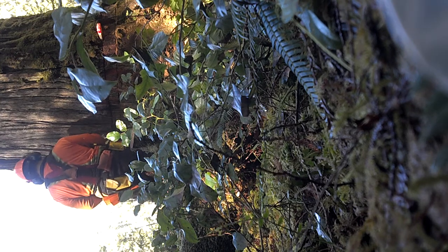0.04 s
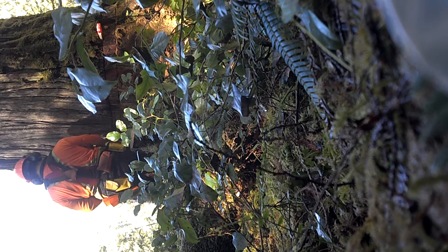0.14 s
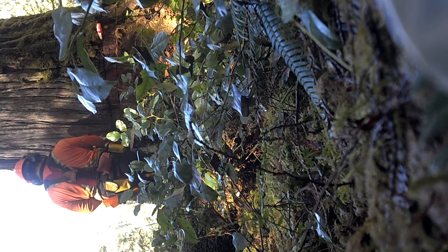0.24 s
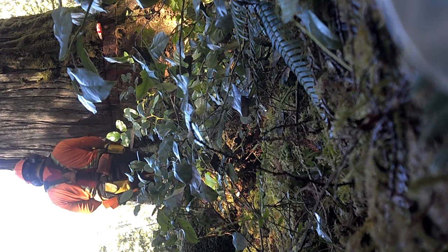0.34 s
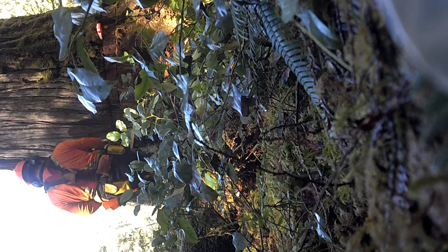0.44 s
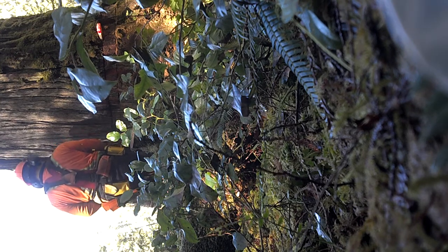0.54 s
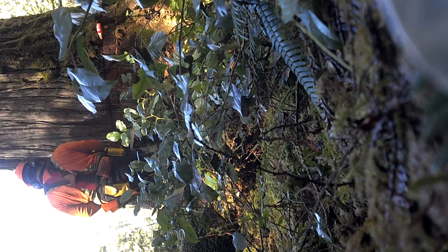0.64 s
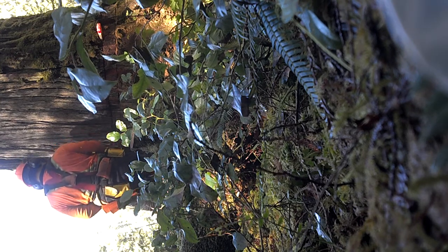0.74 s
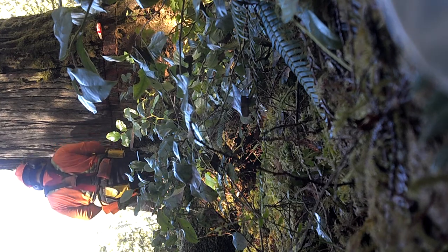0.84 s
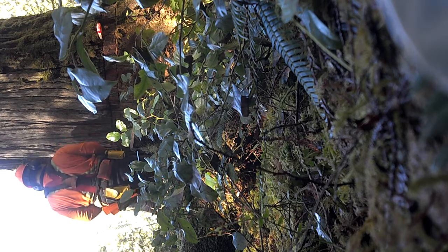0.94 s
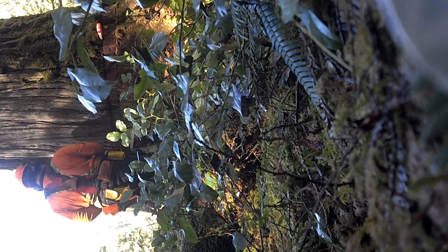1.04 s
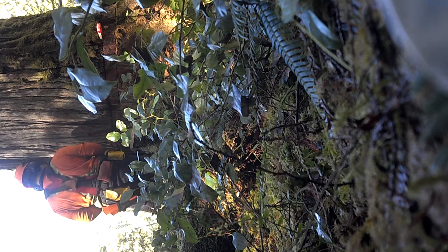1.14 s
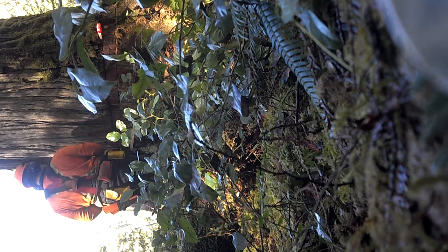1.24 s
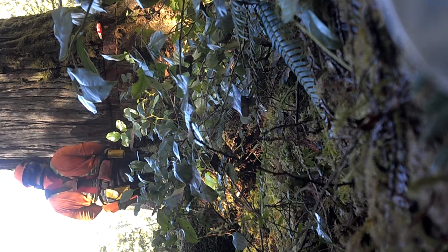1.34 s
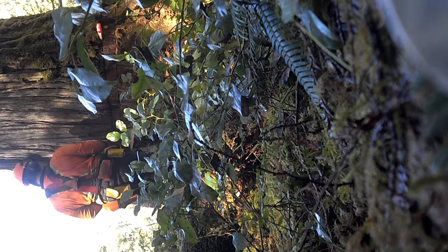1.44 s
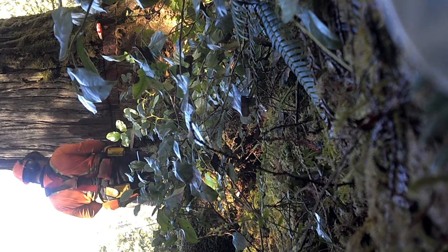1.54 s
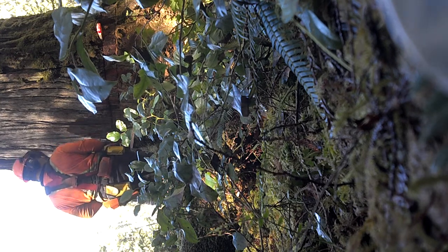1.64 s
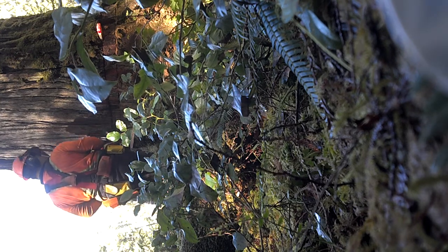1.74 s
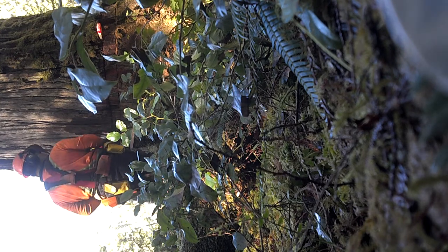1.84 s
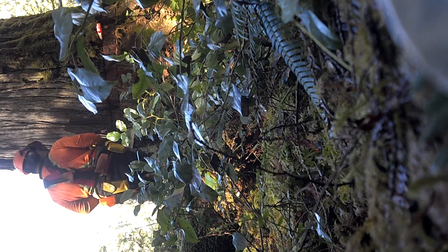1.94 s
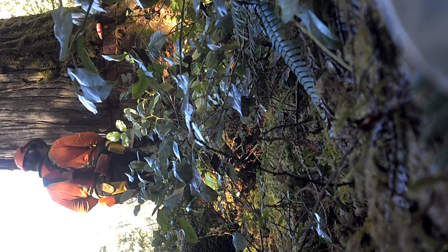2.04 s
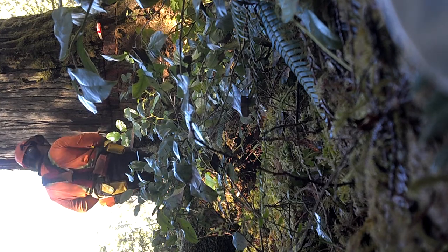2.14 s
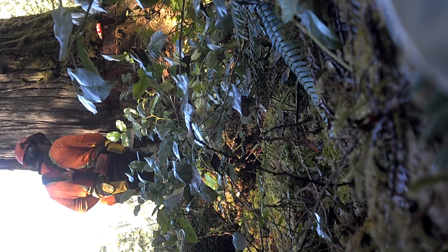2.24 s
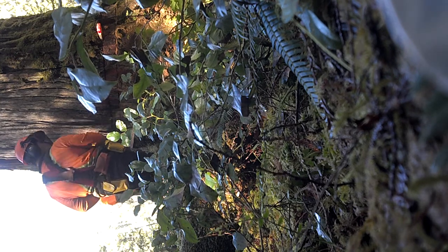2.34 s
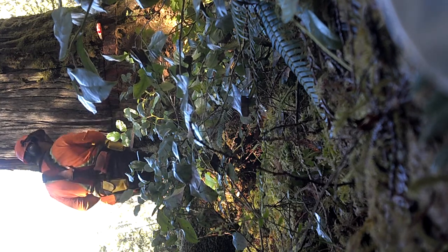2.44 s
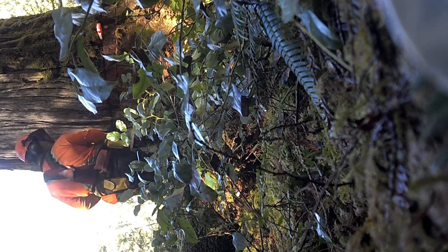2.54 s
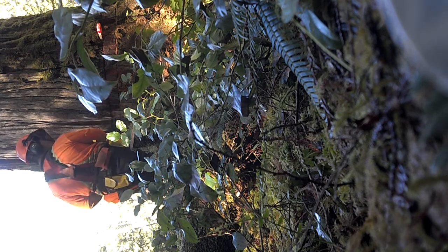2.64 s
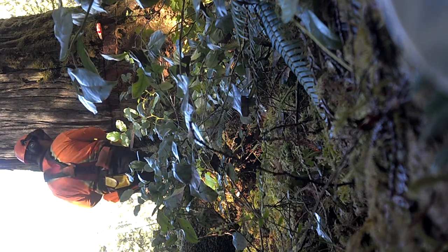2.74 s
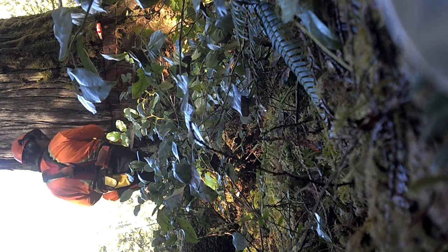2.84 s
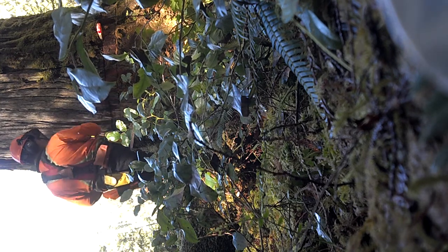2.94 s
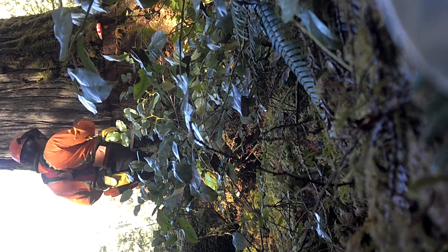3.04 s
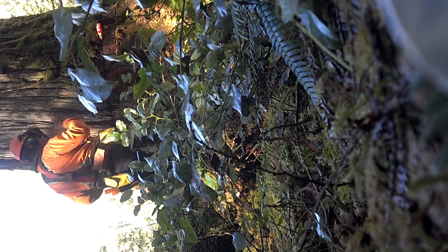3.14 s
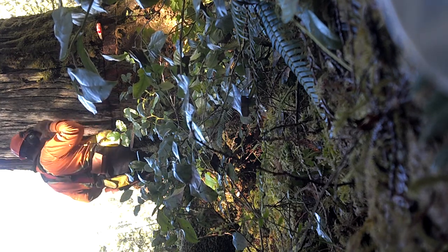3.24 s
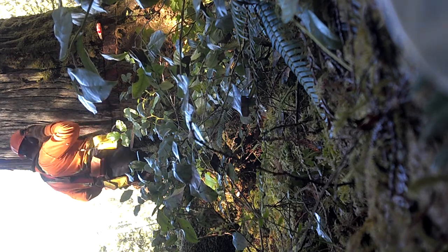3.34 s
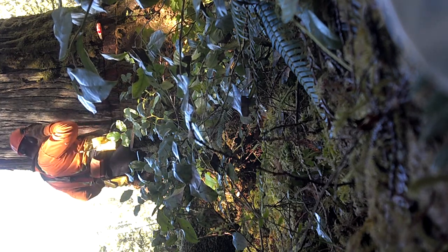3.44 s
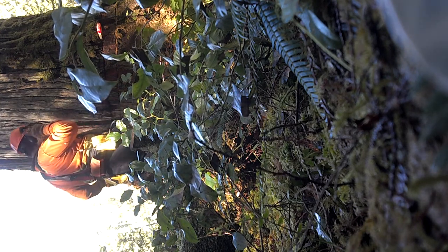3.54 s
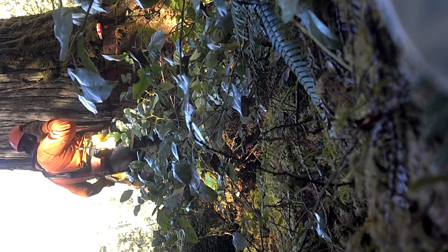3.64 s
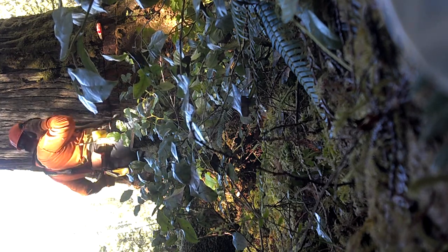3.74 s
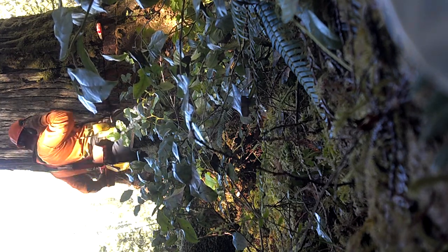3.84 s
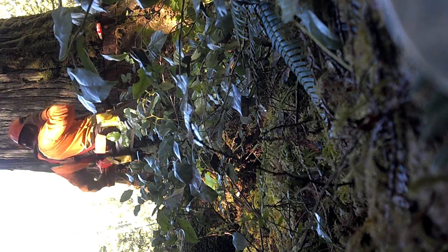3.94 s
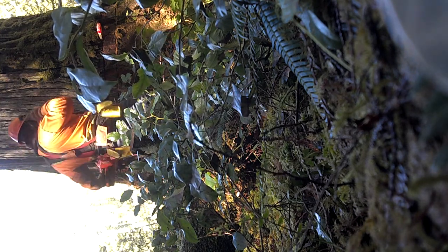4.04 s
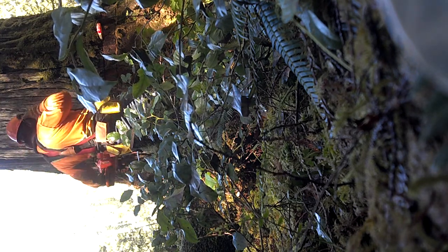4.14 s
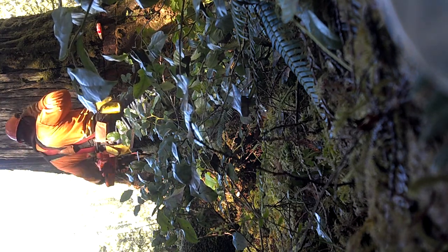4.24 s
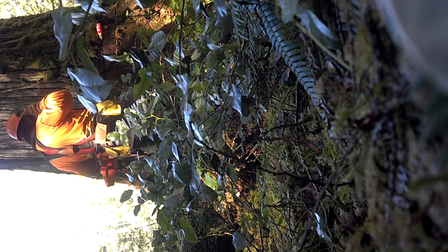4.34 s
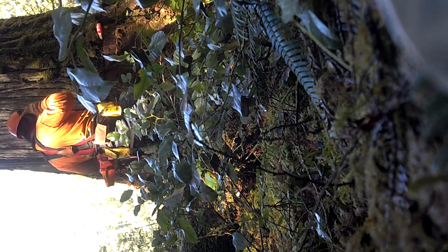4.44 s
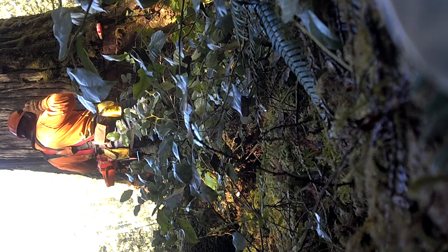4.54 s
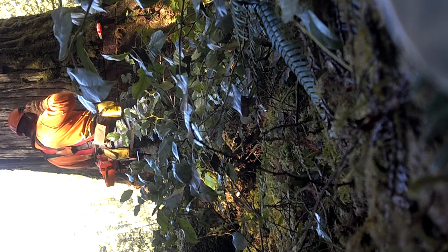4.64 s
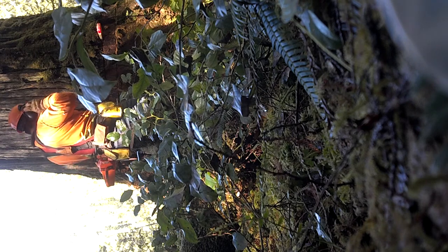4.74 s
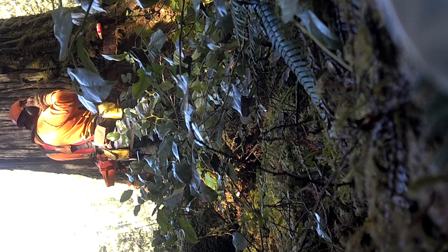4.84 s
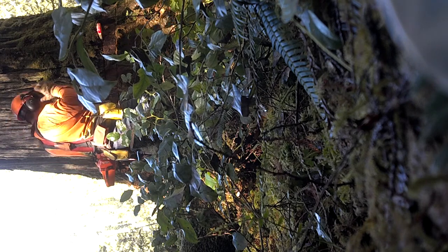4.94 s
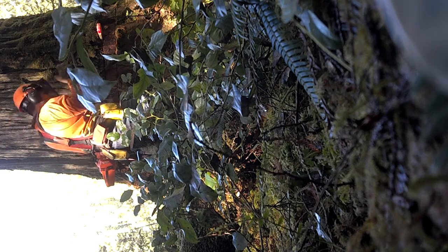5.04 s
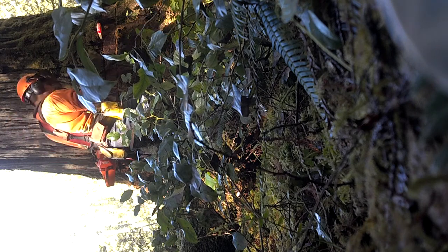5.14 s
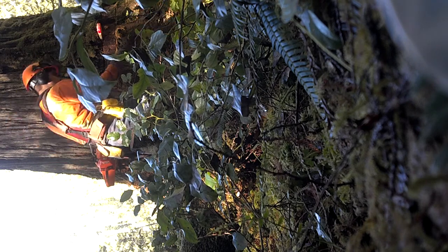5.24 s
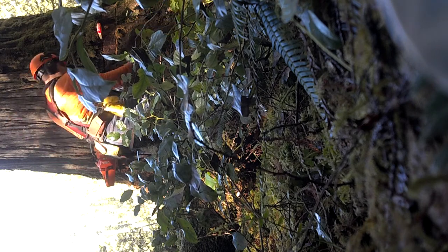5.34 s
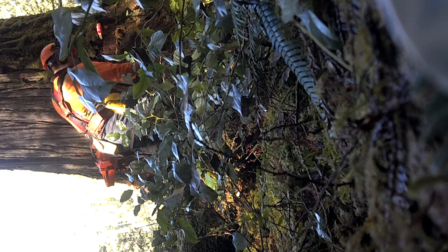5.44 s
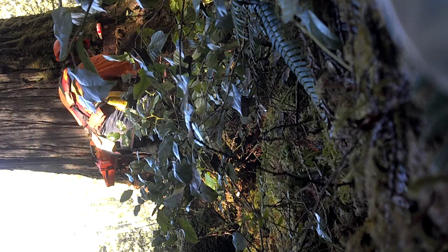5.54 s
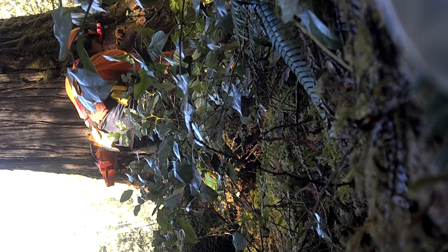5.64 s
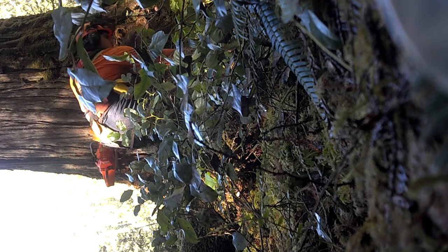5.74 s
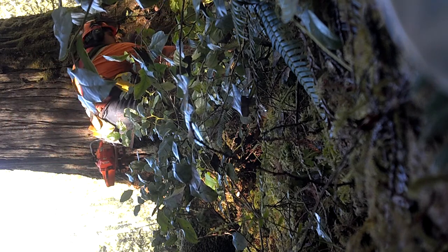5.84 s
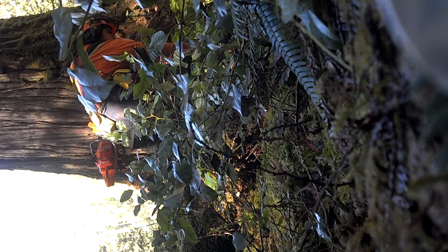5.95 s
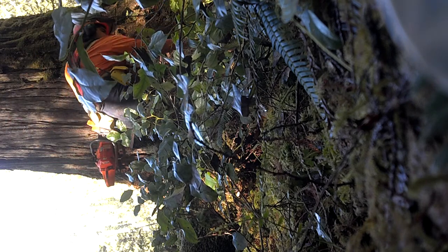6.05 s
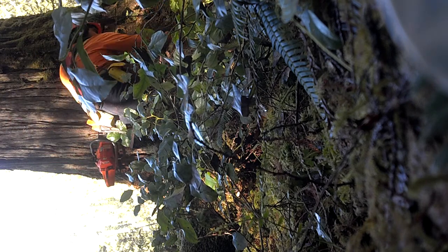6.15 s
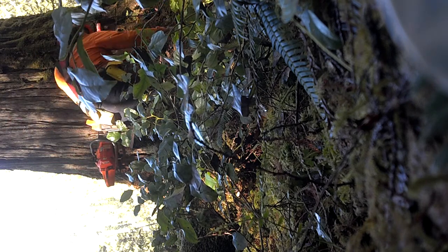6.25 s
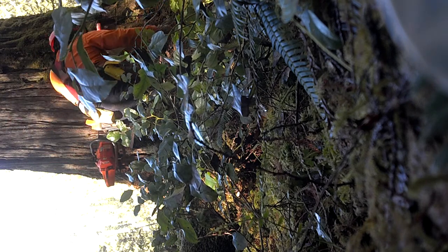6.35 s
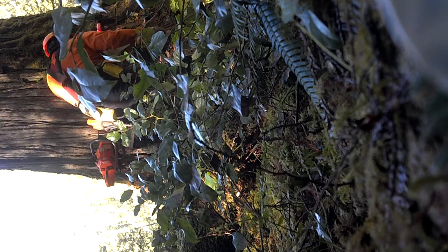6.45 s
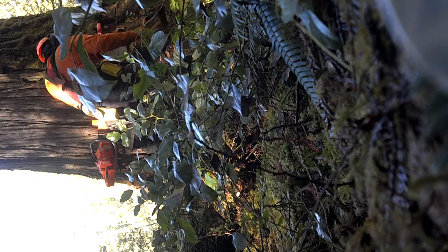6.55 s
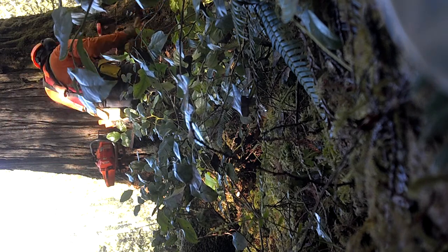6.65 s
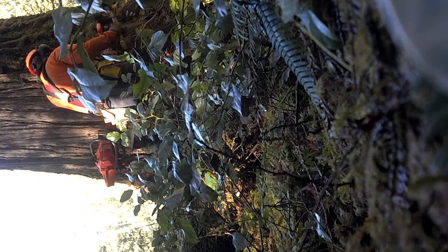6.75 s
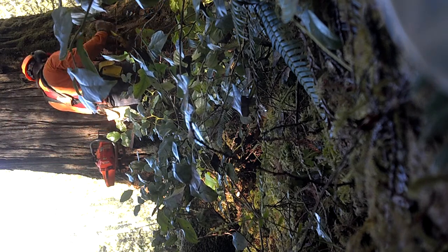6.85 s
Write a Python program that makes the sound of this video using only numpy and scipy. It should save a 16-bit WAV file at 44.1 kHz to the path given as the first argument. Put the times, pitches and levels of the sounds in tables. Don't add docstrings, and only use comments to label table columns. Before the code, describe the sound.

Four raspy throttle bursts from a two-stroke saw, an uneven idle, engine cut, then quiet forest with small clacks and one solid wedge blow.

```python
import sys
import numpy as np
from scipy import signal
from scipy.fft import rfft, irfft, next_fast_len
from scipy.io import wavfile
from scipy.ndimage import uniform_filter1d, map_coordinates

SR = 44100
rng = np.random.default_rng(int(sys.argv[2]) if len(sys.argv) > 2 else 0)


def nominal_scale(level):
    x = np.asarray(level, float) / 20
    return 10 ** x


def wav_out(sig):
    wavfile.write(sys.argv[1], SR, np.round(np.clip(np.atleast_2d(sig).T, -1, 1) * 32767).astype(np.int16))


N = 303849

IGNITION_OFF = 3.83
FREE_TURNS_END = 4.2


def along(points, hz):
    f, value = np.transpose(points)
    return np.interp(np.log(hz + 1), np.log(f + 1), value)


def filtered(x, response):
    m = next_fast_len(N + SR // 2)
    return irfft(rfft(x, m) * response(np.fft.rfftfreq(m, 1 / SR)), m)[..., :N]


def resonant(x, modes, heat=1):
    def response(f):
        gain = 0
        for k, (centre, width, db) in enumerate(modes):
            damping = 1j * f * width
            gain = gain + (-1) ** k * nominal_scale(db) * damping / ((centre * heat) ** 2 - f * f + damping)
        return gain / np.sqrt(np.mean(abs(gain) ** 2))
    return filtered(x, response)


def shifting(x, modes, share, spread):
    cool = resonant(x * np.cos(share * np.pi / 2), modes, 1 - spread)
    return cool + resonant(x * np.sin(share * np.pi / 2), modes, 1 + spread)


def noise(spectrum, channels=1):
    x = filtered(rng.standard_normal((channels, N)), lambda hz: nominal_scale(along(spectrum, hz)))
    return x / x.std()


def pulses(times, sizes):
    at = np.asarray(times)[:, None] * SR
    taps = np.floor(at) + np.arange(-7, 9)
    shape = np.sinc(taps - at) * np.cos(np.pi * (taps - at) / 18) ** 2
    index = np.clip(taps, 0, N).astype(int).ravel()
    return np.bincount(index, (shape * sizes[:, None]).ravel(), N + 1)[:N]


def dying(x, t60):
    return signal.lfilter([1], [1, -nominal_scale(-60 / (t60 * SR))], abs(x))


def wobble(rate):
    return map_coordinates(rng.standard_normal(int(N * rate / SR) + 4), [np.arange(N) * rate / SR])


def drift(rate):
    return np.clip(.5 + 0.35 * wobble(rate), 0, 1)


def soft(x):
    return uniform_filter1d(uniform_filter1d(x, size=17), size=17)


def breathy(x):
    return x + dying(x, .025) * nominal_scale(-41) * rng.standard_normal(N)


# t/s, crank speed f/Hz, exhaust level/dB
ENGINE = [(0, 58, -25), (0.297, 61.2, -28.5), (0.371, 86.1, -20), (0.438, 100, -21.5),
          (0.682, 182.4, -26.5), (0.791, 147, -26), (0.961, 188.8, -24), (1.13, 143.7, -25.5),
          (1.269, 181, -25), (1.489, 126, -27.5), (1.602, 169.6, -24.5), (1.7, 187.4, -25.5),
          (2.091, 105.2, -27), (2.199, 109.7, -23.5), (2.44, 79.4, -25), (2.622, 65.2, -26),
          (2.93, 58, -24.5), (3.83, 56.3, -26.5)]
# from t/s, to t/s, clatter level/dB
THROTTLE = [
    (0.313, 0.689, -37),
    (0.801, 0.965, -39),
    (1.138, 1.279, -33.5),
    (1.503, 1.699, -30.5),
]


def engine(t):
    s, hz, db = np.transpose(ENGINE)
    off = np.clip(t - IGNITION_OFF, 0, FREE_TURNS_END - IGNITION_OFF)
    speed = np.interp(t, s, hz) - 72 * np.maximum(off - .03, 0)
    at_rest = t < THROTTLE[0][0]
    coast_db = -60.5 + 8.5 * np.log2(speed / 58) - 3 * at_rest
    clatter_db = coast_db
    for opens, shuts, open_db in THROTTLE:
        rise = 1 - np.exp(-np.maximum(t - opens, 0) / 0.0047)
        fall = np.exp(-np.maximum(t - shuts, 0) / 0.0042)
        clatter_db = clatter_db + rise * fall * (open_db - coast_db)
    return speed, np.interp(t, s, db) - 14 * off, clatter_db


# t/s, peak level/dB, crack level/dB
KICKS = [(.299, -10, -34), (.3165, -10, -37.5), (.332, -9.5, -37), (.3445, -11, -43.5), (.794, -19, -28),
         (1.132, -21.5, -29.5), (1.492, -37.5, -25.5), (1.709, -23, -29.5), (2.354, -14.5, -61),
         (2.491, -9, -56), (2.547, -15, -40), (2.65, -13.5, -43), (2.727, -19, -51.5), (2.776, -15, -55.5),
         (2.808, -11.5, -45), (2.854, -11, -51.5)]
# t/s, peak level/dB, crack level/dB
LUMPY_IDLE = [(2.9593, -7, -53), (2.9942, -9.5, -59.5), (3.0116, -8, -40.5), (3.0639, -7.5, -42.5),
              (3.1174, -8, -41.5), (3.1703, -9, -43), (3.222, -11.5, -71), (3.2404, -8.5, -52),
              (3.292, -9.5, -40), (3.3452, -8, -49), (3.379, -16, -69), (3.3976, -7.5, -40),
              (3.449, -8.5, -64.5), (3.4851, -8, -48), (3.5204, -10.5, -69), (3.5385, -8.5, -60),
              (3.5737, -8, -49), (3.6276, -7.5, -39.5), (3.680, -8, -41), (3.733, -12.5, -83),
              (3.7498, -9.5, -40.5), (3.7981, -11.5, -71.5), (3.8154, -10, -43)]
# t/s, peak level/dB
BUMPS = [(4.202, -13), (4.237, -12), (4.275, -11), (4.324, -12), (4.382, -13), (4.447, -16.5), (4.518, -18)]
# turns waited, crack level/dB
FIRST_IDLE = [(0, -56), (3, -58), (1, -59), (2, -58), (2, -57), (2, -53), (1, -52), (2, -56)]
# turns waited, crack level/dB
SPUTTER = [(0, -31), (2, -29), (2, -30), (2, -29)]
# start t/s, turn t/s, peak level/dB, rhythm table
SPELLS = [
    (.0285, .018, -13, FIRST_IDLE),
    (2.119, .00917, -27, SPUTTER),
]


def firings():
    rows = KICKS + LUMPY_IDLE + [(s, db, db - 54.5) for s, db in BUMPS]
    for start, turn_s, peak_db, rhythm in SPELLS:
        waits, crack_db = np.transpose(rhythm)
        weak = np.r_[waits[1:], 0] == 1
        rows += zip(start + turn_s * np.cumsum(waits), peak_db + 2.5 - 1 * weak, crack_db)
    return np.array(sorted(rows))


def crank(t, speed, fired):
    turned = np.cumsum(speed) / SR
    phase = np.interp(fired, t, turned)
    whole = np.cumsum(np.maximum(np.round(np.diff(phase, prepend=phase[0])), 0))
    turns = turned + np.interp(t, fired, whole - phase)
    return np.interp(np.arange(-2, np.interp(FREE_TURNS_END - .01, t, turns)), turns, t)


def revolutions():
    t = np.arange(N) / SR
    speed, exhaust_db, clatter_db = engine(t)
    opened = sum(((t > a) & (t < b)) * 1. for a, b, _ in THROTTLE)
    fired, fired_db, crack_db = firings().T
    turn = crank(t, speed, fired)
    at = (turn * SR).astype(int)
    luck = rng.standard_normal((900, 3))[:len(turn)]
    free = abs(turn[:, None] - fired).min(1) > .003
    since_shut = np.min([np.where(turn > b, turn - b, 9) for _, b, _ in THROTTLE], axis=0)
    stumble = 1.5 * (since_shut < .05) * (-1) ** np.arange(len(turn))
    size = free * nominal_scale(exhaust_db[at] + stumble + 0.42 * luck[:, 0]) * np.sqrt(SR / speed[at])
    turn = turn + .00003 * luck[:, 1]
    powered = turn < IGNITION_OFF
    idling = (speed[at] < 62) & powered
    lumpy = ((turn > LUMPY_IDLE[0][0]) | (turn < KICKS[0][0])) & powered
    turn = turn + .0003 * idling * luck[:, 1]
    size = size * nominal_scale(idling * .7 * luck[:, 2] - 2 * lumpy)
    return dict(
        t=t, speed=speed, exhaust_db=exhaust_db, clatter_db=clatter_db, opened=opened,
        fired=fired, crack_db=crack_db, turn=turn, at=at, luck=luck, size=size,
        fast=np.clip((speed[at] - 62) / 30, 0, 1),
        full=np.clip((speed[at] - 92) / 28, 0, 1),
        shut=size * (1 - opened[at]),
        live=np.clip(1 - (turn - IGNITION_OFF) / 0.14, 0, 1),
        bang=nominal_scale(fired_db + 21),
        hard=np.interp(fired, t, speed) > 100,
        hot=np.clip((speed - 120) / 60, 0, 1))


# f/Hz, width f/Hz, level/dB
CATCHING = [(150, 85, 6.5), (328, 82, -2), (454, 66, 6.5), (800, 69, -1.5), (1080, 230, -5.5)]
# f/Hz, width f/Hz, level/dB
BLAST = [(125.8, 37, 20), (336, 68, 13), (499, 29, 13), (840, 85, 4), (1040, 160, -9.5), (1416, 74, -1),
         (1750, 1460, -12), (1860, 600, -21)]


def blast(turn, at, size, opened, full, fired, bang, hard, **_):
    catching = size * opened[at] * (1 - full)
    out = -resonant(soft(pulses(turn, catching * nominal_scale(4.0))), CATCHING)
    gulp = dying(pulses(turn, catching * nominal_scale(-33)), 0.04) * rng.standard_normal(N)
    out += resonant(gulp, BLAST)
    blasts = breathy(pulses(turn, size * opened[at] * full * nominal_scale(5.5)))
    blasts += pulses(fired, bang * hard * nominal_scale(3.0))
    return out - shifting(blasts, BLAST, drift(12.14), spread=0.052)


# f/Hz, width f/Hz, level/dB
COASTING = [(134, 38, 8.5), (352, 53, 10), (500, 29.4, 13), (809, 38, 8), (1025, 46, -2), (1300, 110, -10),
            (1900, 1060, -41.5)]


def coasting(turn, speed, shut, fast, **_):
    puffs = breathy(pulses(turn, shut * fast))
    brisk = np.clip((speed - 100) / 30, 0, 1)
    puffs = puffs * brisk + soft(puffs * (1 - brisk))
    return shifting(puffs, COASTING, np.clip(drift(8.3) + (speed - 145) / 90, 0, 1), spread=0.044)


# f/Hz, width f/Hz, level/dB
MUFFLER = [(196.5, 140, -1), (320.7, 54.5, 16.5), (473.7, 42, 4.5), (605, 19, -36), (780, 15, -7),
           (910, 420, -24)]
ANSWER_S = 0.006237


def pumping(turn, at, speed, shut, live, fast, **_):
    pump = shut * live * (1 - fast) * nominal_scale(5.0)
    puffs = pulses(turn, pump) + 0.21 * pulses(turn + ANSWER_S, pump)
    out = resonant(soft(breathy(puffs)), MUFFLER)
    warm = np.clip((speed[at] - 56) / 6, 0, 1) * (1 - fast)
    cross = soft(pulses(turn, shut * live * warm * nominal_scale(-4.5)))
    cross_modes = [(509, 22.7, 6.0), (787, 30, 3.8)]
    return out + shifting(cross, cross_modes, np.clip((speed - 58) / 9, 0, 1), spread=0.033)


# f/Hz, width f/Hz, level/dB
FIRED = [(172, 230, -4.5), (340.7, 50.4, 9.5), (460, 31, 3.5), (615.3, 22, -7), (853, 27, -17.5),
         (1026, 72, -21.5)]
# f/Hz, width f/Hz, level/dB
ANSWER = [(341, 125, -6.5), (478.5, 41.3, 7), (822, 30, -11.5)]


def single_firings(fired, bang, hard, crack_db, **_):
    burn = bang * ~hard * (fired < IGNITION_OFF) * nominal_scale(-1.5)
    start = fired - .0015
    out = -resonant(soft(pulses(start, burn)), FIRED)
    out -= 0.32 * resonant(soft(pulses(start + ANSWER_S, burn)), ANSWER)
    sharp = pulses(fired, ~hard * nominal_scale(crack_db + 29.5))
    return out + resonant(sharp, [(930, 56, -6), (4240, 29, -22.0)])


# f/Hz, width f/Hz, level/dB
COLD = [(166, 48, 4.5), (304, 50, 9.5), (484, 106, -6.5), (582.6, 11, -7), (890, 110, -25),
        (2100, 163, -23.5)]
# f/Hz, width f/Hz, level/dB
CASE = [(125, 30, 0)]


def running_down(t, turn, speed, shut, live, fired, bang, **_):
    charge = shut * (1 - live) * nominal_scale(3.5)
    transfer = turn + 0.2735 / np.interp(turn, t, speed)
    twice = pulses(turn, charge) + 0.83 * pulses(transfer, charge)
    last = bang * (fired > IGNITION_OFF)
    bumps = last * nominal_scale(-7.0)
    twice += pulses(fired, bumps) + .85 * pulses(fired + .0085, bumps)
    out = resonant(uniform_filter1d(breathy(twice), size=15), COLD)
    return out + resonant(uniform_filter1d(pulses(fired, last * nominal_scale(-10.5)), size=90), CASE)


# f/Hz, width f/Hz, level/dB
SHELL = [(3060, 200, -29), (3620, 420, 26), (4500, 200, -16), (6660, 410, 14), (10400, 1600, 3),
         (14500, 2300, 2)]
# f/Hz, width f/Hz, level/dB
BAR = [(1650, 58, 8), (1900, 180, -1)]
# f/Hz, width f/Hz, level/dB
PING = [(3360, 130, -2), (5080, 270, -7.5)]


def shell(turn, at, size, opened, full, hot, luck, clatter_db, fired, hard, crack_db, **_):
    jet_db = clatter_db[at] + 24.5 - 2 * hot[at] - 5.1 * (1 - full) + 0.5 * luck[:, 2]
    kicks = pulses(turn + 0.0023, opened[at] * nominal_scale(jet_db))
    kicks += pulses(fired + 0.001144, hard * nominal_scale(crack_db + 18.0))
    jets = kicks + nominal_scale(-30) * dying(kicks, .03) * nominal_scale(3 * wobble(30)) * rng.standard_normal(N)
    out = resonant(jets * (1 - hot), SHELL, heat=.94) + resonant(jets * hot, SHELL, heat=1.02)
    shut_share = 0.11
    damping_db = np.maximum(clatter_db[at] + 50.0, 0)
    cover = (shut_share + (1 - shut_share) * opened[at]) * nominal_scale(-0.5 - damping_db)
    out += resonant(hot * pulses(turn, size * cover), BAR)
    return out + resonant(pulses(fired + 0.0025, hard * nominal_scale(crack_db + 21)), PING)


# f/Hz, level/dB per Hz
CRACK = [(500, 23), (1000, 3), (2000, 1), (4000, -7.5), (7500, 0.5), (11000, -8), (16000, -17)]
# f/Hz, level/dB per Hz
TICK = [(2000, -19), (4000, -2), (7000, -10), (12000, -28.5), (16000, -11.5)]


def cracks(fired, hard, crack_db, **_):
    out = dying(pulses(fired + 0.001208, nominal_scale(crack_db + 8.0)), 0.034) * noise(CRACK)[0]
    slap = pulses(fired + .0005, ~hard * nominal_scale(crack_db + 0.5))
    return out + dying(slap, 0.018) * noise(TICK)[0]


# f/Hz, level/dB per Hz
CHAIN = [(700, -48.5), (1200, 1), (1900, 0), (3500, -3.5), (5000, -8), (8000, -13.5), (11000, -23),
         (16000, -26)]


def chain(t, opened, clatter_db, **_):
    running = (1 - .88 * opened) * np.clip((FREE_TURNS_END + .12 - t) / .25, 0, 1)
    level = nominal_scale(clatter_db + 10.0 + 1.15 * wobble(60))
    return uniform_filter1d(running, 600) * level * noise(CHAIN)[0]


def scream(angle, speed, clatter_db):
    centre = 3660 + 9 * (speed - 160)
    on = slice(0, 3 * SR)
    out = np.zeros(N)
    for k in range(17, 30):
        off = (k * speed[on] - centre[on]) / 190
        out[on] += nominal_scale(2.3 * wobble(45)[on]) / (1 + off ** 2) * np.sin(k * angle[on] + np.arctan(off))
    return out * nominal_scale(-35 + 1.3 * (clatter_db + 30)) * np.clip((speed - 110) / 30, 0, 1)


# multiple of crank speed, level/dB
FAN = [(17, 4), (19, 1.5), (20, -5.5), (21, 4.5), (22, -27.5)]


def rotating_parts(t, turn, speed, opened, exhaust_db, clatter_db, **_):
    angle = 2 * np.pi * np.interp(t, turn, np.arange(len(turn)))
    whine = np.zeros(N)
    for order, db in FAN:
        whine += nominal_scale(db + 2.8 * wobble(40.04)) * np.sin(order * angle + 0.12 * wobble(82))
    whine *= nominal_scale(-45 + 0.14 * (clatter_db + 32.5)) * np.clip((speed - 100) / 40, 0, 1)
    slipping = np.interp(speed, [57, 64, 108, 125], [0, 1, 1, 0])
    slipping = slipping * uniform_filter1d(1 - opened, size=900) * (t > 2.19)
    drum = slipping * nominal_scale(exhaust_db - 5 + 2.5 * wobble(34.7)) * np.sin(5 * angle)
    return whine + scream(angle, speed, clatter_db) + drum


def saw():
    shared = revolutions()
    parts = [blast, coasting, pumping, single_firings, running_down, shell, cracks, chain, rotating_parts]
    return sum(part(**shared) for part in parts)


# t/s, snap peak level/dB, wood level/dB, snap t60 t/s, ring f/Hz
KNOCKS = [(4.319, -50, -76, 0.11, 12730), (4.423, -54.5, -64, 0.11, 7400), (4.48, -37.5, -56, 0.059, 1750),
          (4.496, -52, -76, 0.07, 2520), (4.533, -43, -62, 0.07, 11500), (5.299, -64, -55, 0.019, 7950),
          (5.322, -41, -65, 0.063, 4670), (5.33, -61.5, -22.5, 0.042, 1900),
          (5.346, -42.5, -34.5, 0.032, 4500), (5.364, -44, -61, 0.028, 5020),
          (5.936, -53.5, -57, 0.053, 1750), (5.976, -52.5, -50.5, .03, 1900),
          (6.044, -52.5, -75, 0.051, 2050), (6.209, -30, -17, 0.02, 1900)]
# f/Hz, width f/Hz, level/dB
TRUNK = [(360, 70, 14), (527, 210, -7), (1100, 140, -7), (1520, 260, -23), (1900, 180, 0.5)]
# f/Hz, level/dB per Hz
SNAP = [(600, 7), (1900, 1.5), (2600, 2), (4500, -3), (7500, -5.5), (9500, -7), (16000, -19)]


def knocks():
    t = np.arange(SR // 8) / SR
    snap, push, ring = np.zeros((3, N + SR))
    for s, db, wood_db, t60, hz in KNOCKS:
        fall = nominal_scale(db - 60 * t / np.clip(t60, .01, .2)) * np.minimum(t / 0.0002, 1)
        at = slice(round(s * SR), round(s * SR) + len(t))
        snap[at] += fall * nominal_scale(-3 + 0.52 * (db + 46) + 5.5)
        narrow = signal.lfilter(*signal.butter(1, 500 / SR), rng.standard_normal(len(t)))
        ring[at] += fall * nominal_scale(18.5) * narrow * np.cos(2 * np.pi * hz * t)
        swell = t / 0.0068 * np.exp(1 - t / 0.0023)
        grit = 2.5 * rng.standard_normal(len(t))
        push_hz = 380 if wood_db > -22 else 480
        push[at] += nominal_scale(wood_db + 6.0) * swell * (np.cos(2 * np.pi * push_hz * t) + grit)
    return snap[:N] * noise(SNAP)[0] + ring[:N] + nominal_scale(-11.5) * resonant(push[:N], TRUNK)


# f/Hz, level/dB
SHADOW = [(100, 0), (500, 1), (1700, 5.5), (2200, -5.5), (3000, -41), (9000, -51), (13000, -66.5)]
# f/Hz, lag/rad
LAG = [(80, 0.04), (430, 0.47), (560, 0.86), (700, 1.33), (1030, 2.13), (1720, 4.33), (2000, 5.6),
       (2300, 6.1)]


def far_port(near):
    return filtered(near, lambda hz: nominal_scale(along(SHADOW, hz)) * np.exp(-1j * along(LAG, hz)))


# f/Hz, t60 t/s
WOODS = [(200, 0.057), (2000, 0.23), (10000, 0.2)]


def woods(x):
    hz, t, z = signal.stft(rng.standard_normal((2, SR // 3)), SR, nperseg=256)
    tail = signal.istft(z * nominal_scale(-60 * t / along(WOODS, hz)[:, None]), SR, nperseg=256)[1]
    tail = tail / np.linalg.norm(tail[0])
    scattered = signal.fftconvolve(np.pad(x, (150, 0))[None], tail, axes=1)[:, :N]
    colour = [(130, -16), (400, -12), (2000, -13.5), (4000, -18)]  # (Hz, dB)
    return filtered(scattered, lambda hz: nominal_scale(along(colour, hz)))


# f/Hz, level/dB per Hz
HUSH = [(25, -27), (60, -14), (150, -1.5), (430, 4.5), (700, -9), (1000, -20.5), (3600, -30.5),
        (16000, -40.5)]
# t/s, level/dB
HUSH_LEVEL = [(4.5, -39), (4.7, -46), (5.3, -39), (6.89, -38)]
# f/Hz, likeness
ALIKE = [(80, 0.43), (200, 0.93), (500, 0.92), (850, 0.67), (1200, 0.067), (3000, 0.13)]


def hush():
    def mid_and_side(hz):
        half_angle = np.arccos(np.clip(along(ALIKE, hz), -1, 1)) / 2
        return np.array([np.cos(half_angle), np.sin(half_angle)])
    mid, side = filtered(noise(HUSH, channels=2), mid_and_side)
    far = filtered(mid - side, lambda hz: nominal_scale(1.5) * np.exp(-.7j * along(LAG, hz)))
    level_db = np.interp(np.arange(N) / SR, *np.transpose(HUSH_LEVEL))
    swell_db = wobble(3.79) + wobble(12)
    return np.array([mid + side, far]) * nominal_scale(level_db - 9.5 + swell_db)


def scene():
    near = saw() + knocks()
    return np.array([near, far_port(near)]) + woods(near) + hush()


def top_cut(x):
    return signal.sosfilt(signal.butter(12, 17120, fs=SR, output="sos"), x)


def record(dry):
    delay = 16 / 44100
    dry = filtered(dry, lambda hz: (1j * hz / (60 + 1j * hz)) ** 2 * (hz < 16400))
    wide = dry - filtered(dry[::-1], lambda hz: .995 * np.exp(-2j * np.pi * hz * delay))

    def kept(hz):
        off_notch = abs((hz * delay + np.array([[.5], [0]])) % 1 - .5) / delay
        emptied = (off_notch < np.maximum(.042 * hz, 170)) & (hz > 2000)
        return np.where(emptied, nominal_scale(-45), 1)
    mid, side = filtered(np.array([wide[0] + wide[1], wide[0] - wide[1]]) / 2, kept)
    return top_cut(np.array([mid + side, mid - side]))


dry = scene()
out = record(dry)
wav_out(out)
```